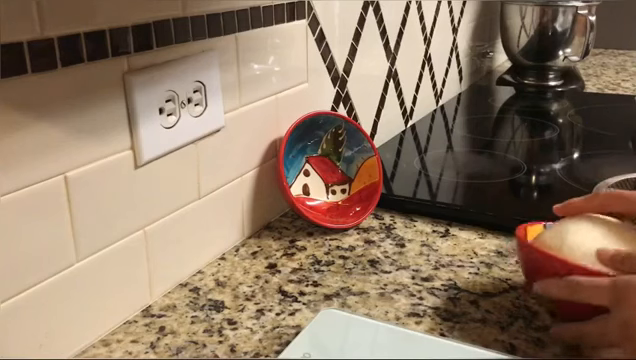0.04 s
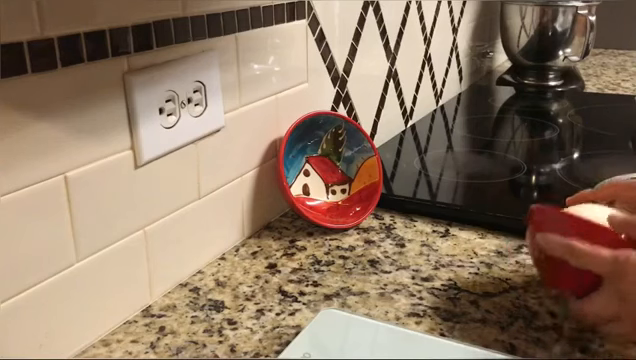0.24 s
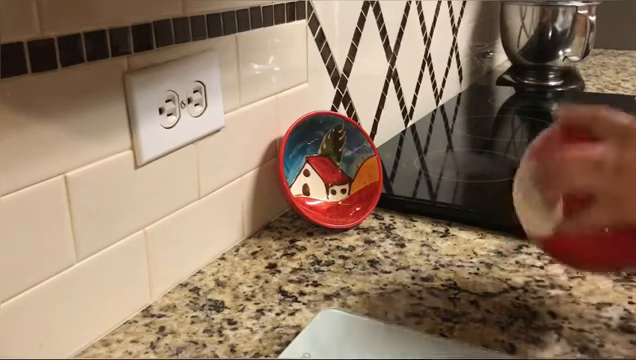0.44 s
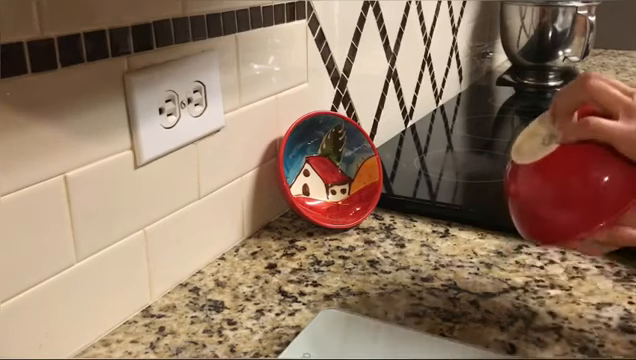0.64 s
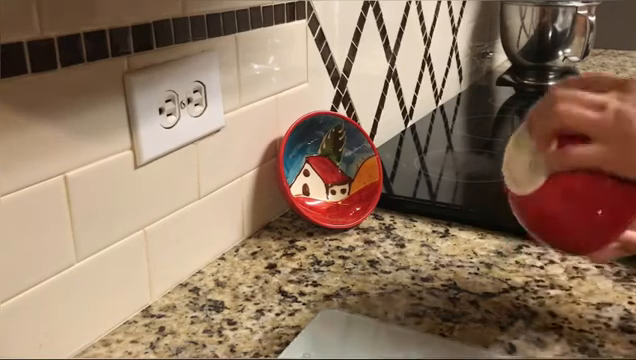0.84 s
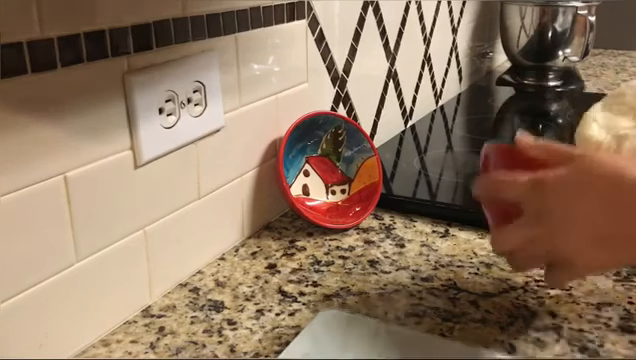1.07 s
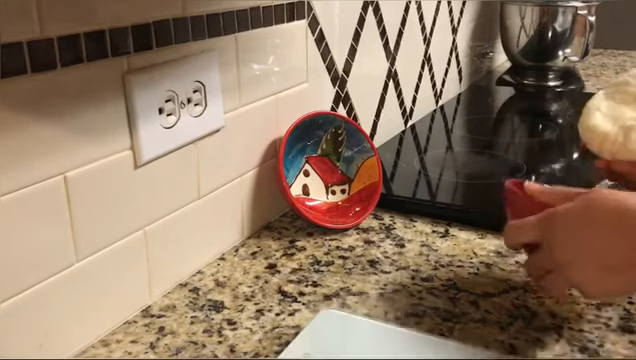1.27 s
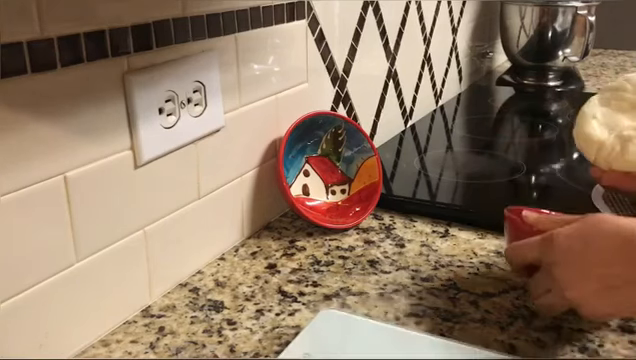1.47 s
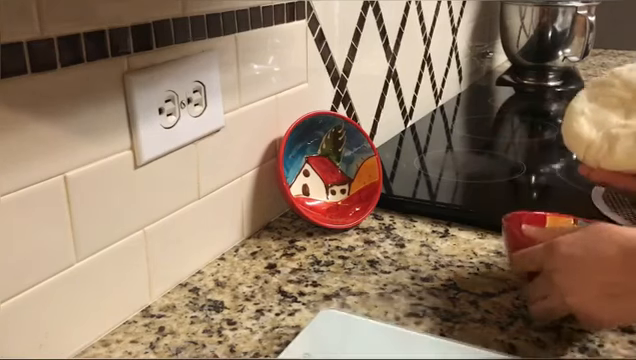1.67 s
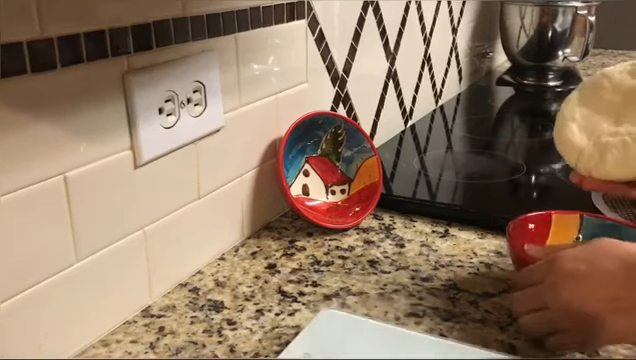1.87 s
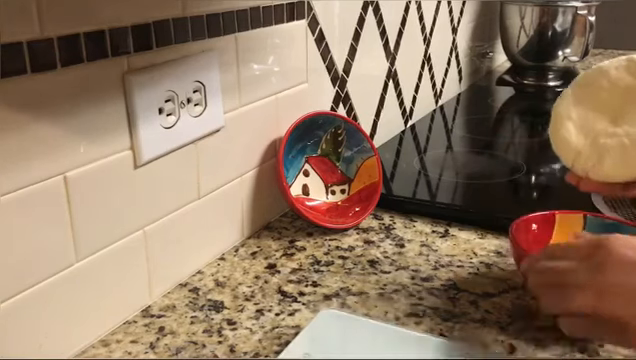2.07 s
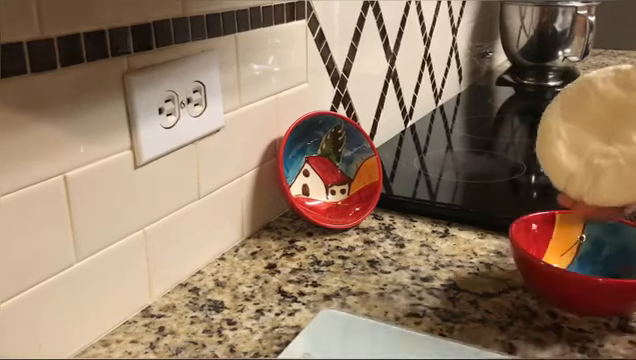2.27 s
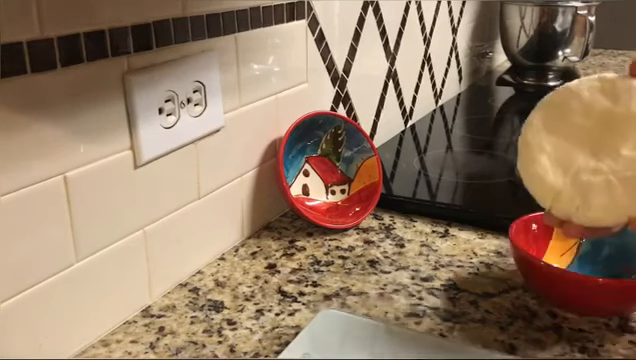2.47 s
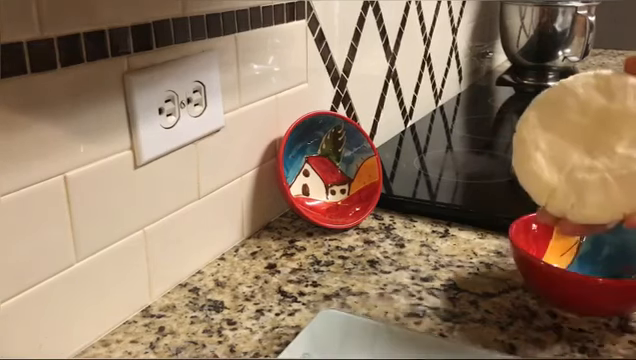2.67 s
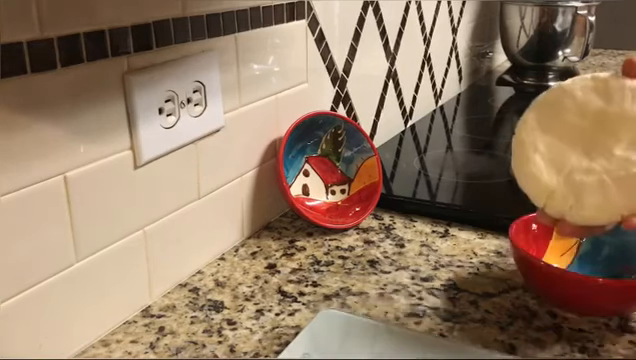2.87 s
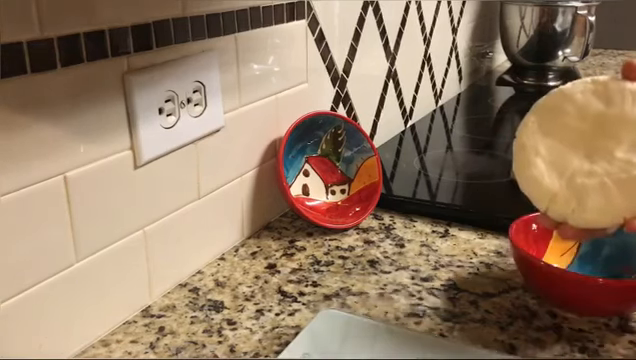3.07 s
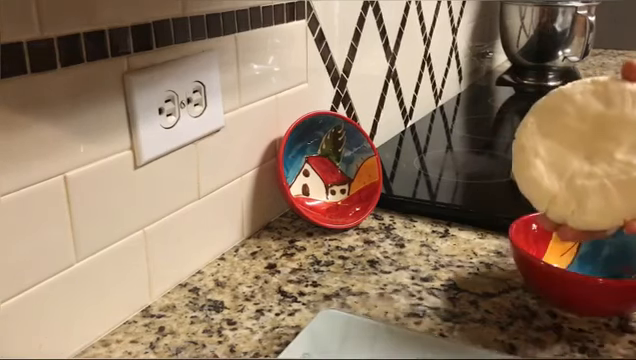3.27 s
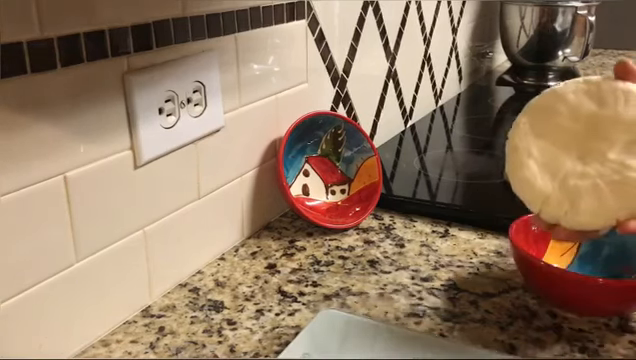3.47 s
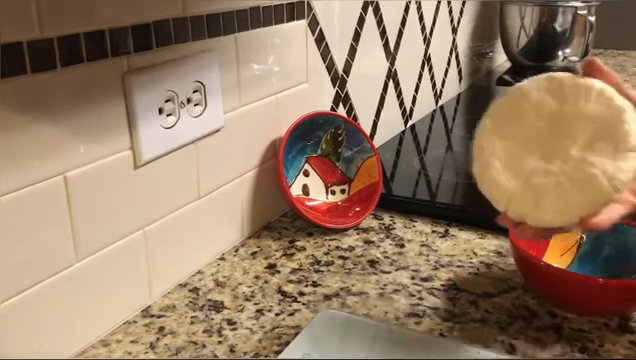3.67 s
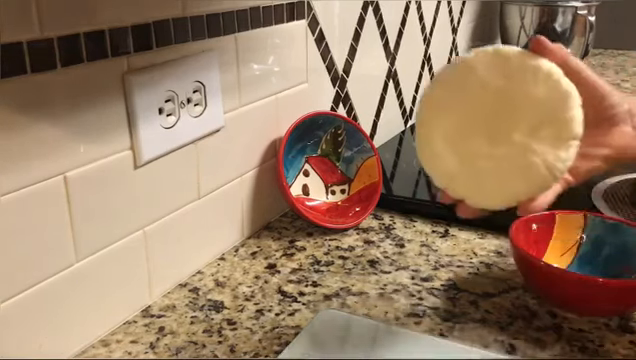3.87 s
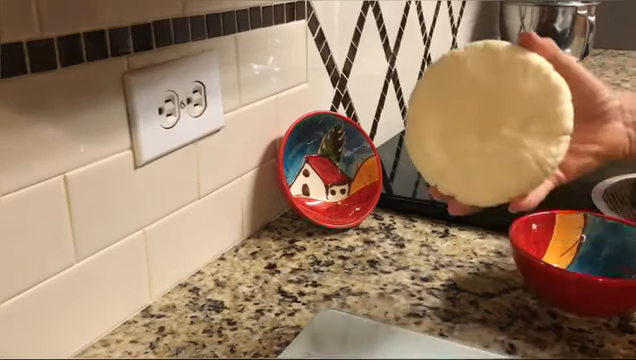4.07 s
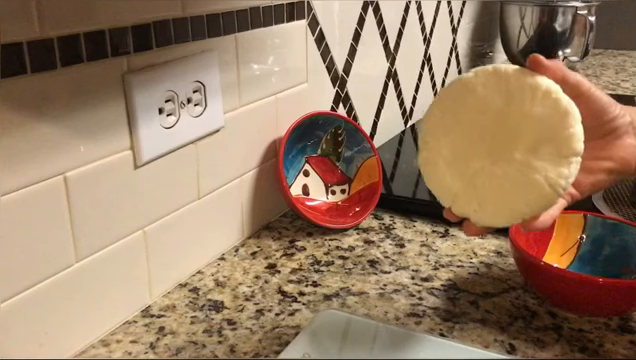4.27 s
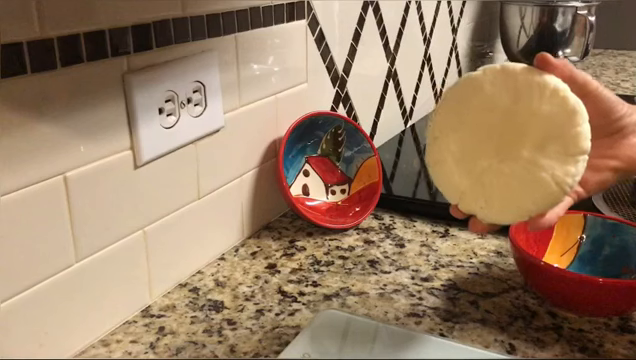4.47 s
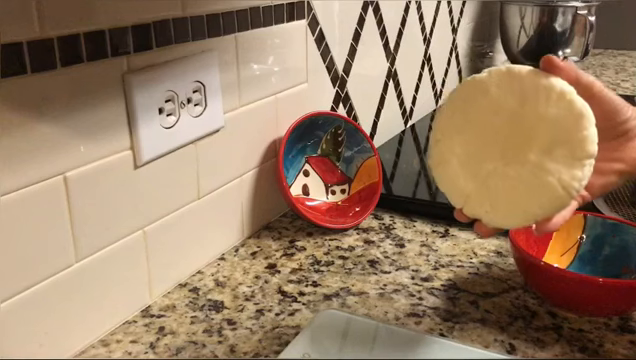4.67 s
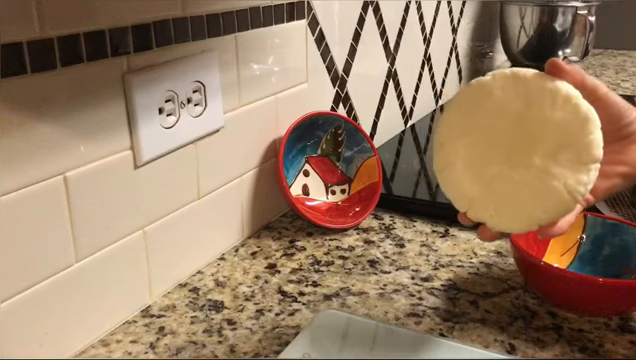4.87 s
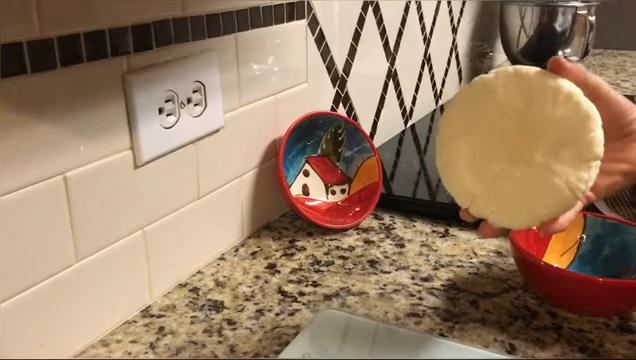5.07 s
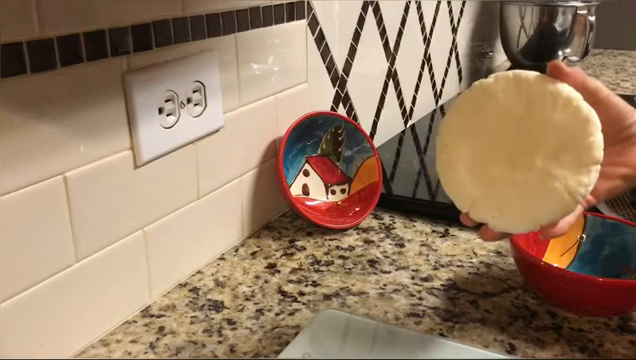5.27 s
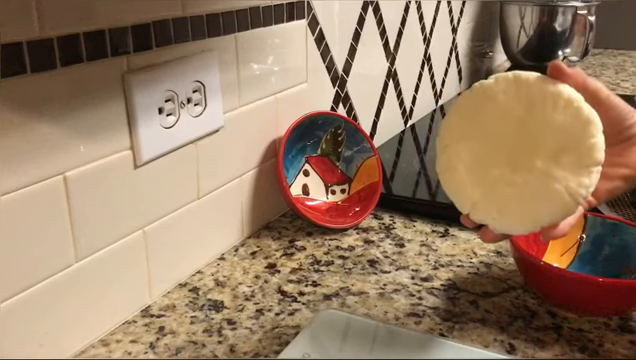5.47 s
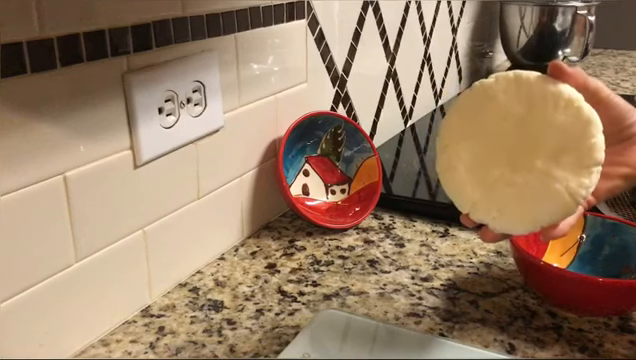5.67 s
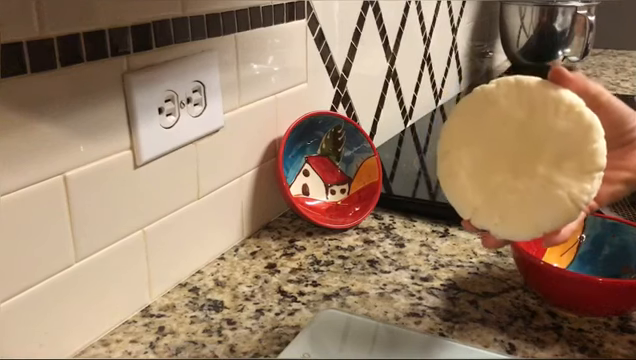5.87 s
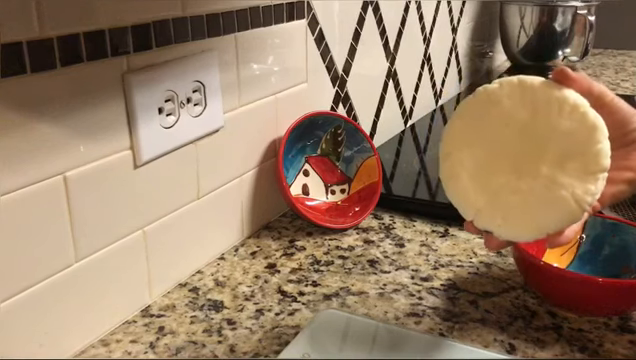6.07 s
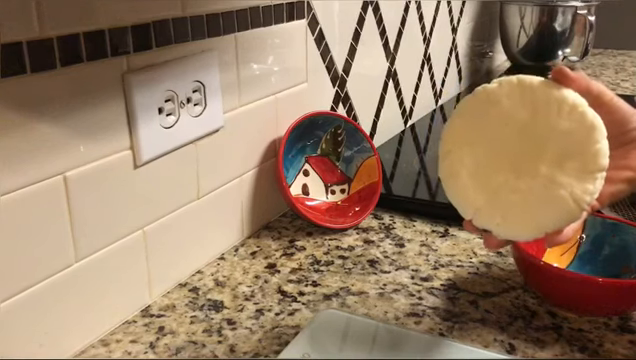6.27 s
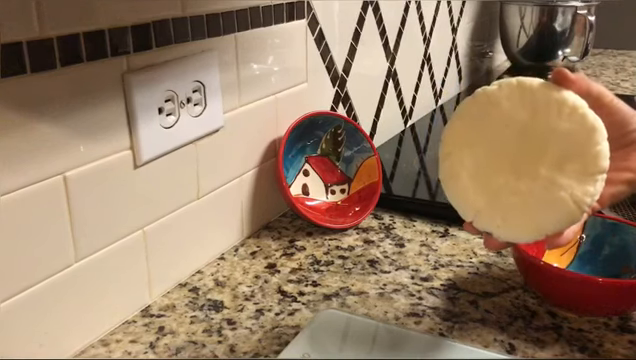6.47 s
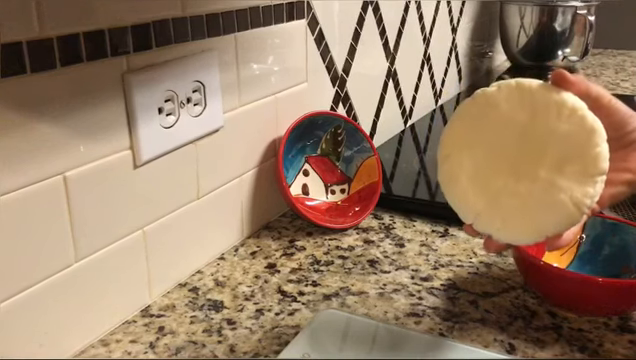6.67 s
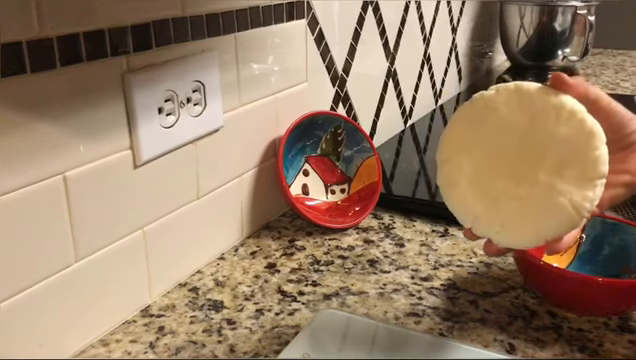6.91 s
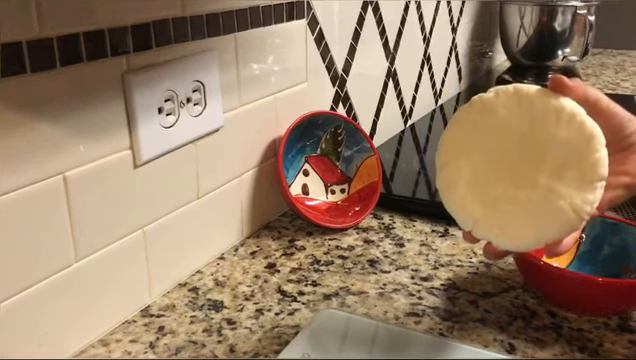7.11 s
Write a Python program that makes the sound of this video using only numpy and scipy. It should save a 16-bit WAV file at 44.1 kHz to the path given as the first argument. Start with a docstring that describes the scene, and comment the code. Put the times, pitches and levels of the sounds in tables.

```python
"""First you hear a kitchen appliance humming and moving air buffeting the microphone. Fingers slip,
squeak and brush as a round of cheese is turned out of a small ceramic bowl. The bowl knocks on a stone
counter, slides and is set down: each blow thuds in the counter and makes the bowl ring like glass.
Later, something small and hard gives a few dry clicks close by. The tiles echo the bowl and the clicks."""
import sys
import numpy as np
from scipy import signal
from scipy.fft import rfft, irfft, next_fast_len
from scipy.io import wavfile
from scipy.ndimage import uniform_filter1d

SR = 44100
rng = np.random.default_rng(int(sys.argv[2]) if len(sys.argv) > 2 else 0)


def master(y):
    """Save y as 16-bit WAV."""
    cut = np.clip(np.atleast_2d(y).T, -1, 1)
    pcm = np.round(cut * 32767)  # scale
    wavfile.write(sys.argv[1], SR, pcm.astype(np.int16))


N = 314874
T = np.arange(N) / SR


def amp(db):
    """Turn decibels into a number to multiply by."""
    return 10 ** (np.asarray(db) / 20)

def unit(x):
    """Scale to an average size (rms) of 1."""
    return x / np.sqrt(np.mean(x ** 2))

def norm(x):
    """Scale to a total energy of 1."""
    return x / np.sqrt(np.sum(x ** 2))

def add(out, s, x):
    """Mix x into out, starting at s seconds."""
    i = int(round(s * SR))
    out[i:i + len(x)] += x[:N - i]

def cut(x, hz, kind="low", order=2):
    """Keep the "low" or the "high" side of hz; a higher order cuts more sharply."""
    return signal.sosfilt(signal.butter(order, np.minimum(hz, .49 * SR), kind, fs=SR, output="sos"), x)

def noise(points, size=N):
    """Noise of rms 1 whose tone colour follows (f/Hz, level/dB) points."""
    hz, db = np.transpose(points)
    span = next_fast_len(size, real=True)
    f = np.maximum(np.arange(span // 2 + 1) * SR / span, 1)
    gain = amp(np.interp(np.log(f), np.log(hz), db))
    return unit(irfft(gain * rfft(rng.standard_normal(span)), span)[:size])

def walk(rate):
    """A smooth random wobble of rms 1, taking `rate` steps a second."""
    hold = int(SR / rate)
    steps = np.repeat(rng.standard_normal(256), hold)[:N]
    return unit(uniform_filter1d(uniform_filter1d(steps, hold), hold))

def fade(t60, size):
    """A fade that drops by 60 dB every t60 seconds."""
    return np.exp(-np.log(1000) * T[:size] / t60)

def ring(hz, db, t60, size):
    """Add up fading tones; neighbours start by swinging opposite ways."""
    t60 = np.broadcast_to(t60, len(hz))
    return sum((-1) ** k * amp(db[k]) * fade(t60[k], size) * np.sin(2 * np.pi * hz[k] * T[:size])
               for k in range(len(hz)))

def resonate(tones, size):
    """A ring of energy 1 from (f/Hz, width/Hz, level/dB) rows: wider tones die sooner."""
    hz, width, db = np.transpose(tones)
    return norm(ring(hz, db + 20 * np.log10(width), np.log(1000) / (np.pi * width), size))

def swell(s, rise, fall):
    """The strength of one movement: it builds up to 1 at time s and dies away."""
    return np.exp(-((T - s) / np.where(T < s, rise, fall)) ** 2)

def swells(rows):
    """Add up movements from (peak t/s, rise/s, fall/s, level/dB) rows."""
    return sum(amp(db) * swell(s, rise, fall) for s, rise, fall, db in rows)


# The appliance's low hum: f/Hz, level/dB
HUM = [(49.25, -42.5), (120, -74), (147.75, -57.5), (150.35, -60.5), (360, -73)]
# A motor's thin whines: f/Hz, relative level/dB
WHINE = [(888.2, -84.5), (1233, -82.5), (1281, -96.5), (1330, -79.5), (1427, -81.5), (1561, -89),
         (2078, -90.5), (2277, -95.5)]
# The tone colour of the room's air: f/Hz, relative level/dB
ROOM_AIR = [(20, -3.5), (45, -9), (70, -17), (120, -24.5), (180, -22.5), (250, -27.5), (350, -28.5),
            (430, -35), (600, -34), (1100, -46), (1400, -42.5), (1800, -50), (4000, -54.5), (10000, -57.5),
            (16000, -63)]

def appliance_and_air(air_db, whine_gain_db, waver_db):
    """Two motors hum, throbbing as they drift in and out of step; thin whines waver over the air."""
    crest_s = .117  # here the hum's tones all swell together
    hum = sum(amp(db) * np.cos(2 * np.pi * hz * (T - crest_s)) for hz, db in HUM)
    waver = amp(whine_gain_db + waver_db * walk(11))
    lag_s = 0.00015 * walk(30)  # the shaft's speed wanders, and every whine with it
    whine = waver * sum(amp(db) * np.sin(2 * np.pi * hz * (T + lag_s)) for hz, db in WHINE)
    air = noise(ROOM_AIR)
    air /= np.std(cut(air, 202, "high", order=6))  # air_db sets the part above the rumble
    return np.sqrt(2) * (hum + whine) + amp(air_db) * air


# Air pushed by moving hands: peak t/s, rise/s, fall/s, level/dB
GUSTS = [(.39, 0.22, .3, -15), (1.35, 0.47, 0.44, -28.5), (2.35, .35, 0.196, -24), (5.1, 0.34, 0.2, -37.5)]
# Soft pops of air: t/s, strength/dB, rise/s, fall/s, tick strength/dB
POPS = [(0.2255, -11, 0.00057, 0.019, -74), (1.3291, -10, 0.00039, 0.019, -22.5)]

def air_buffets(draught_db, tick_t60, swing_hz):
    """Air pushes on the microphone: slow swings, and two sudden dips in pressure, each with a tick."""
    swing = noise([(1, -12), (swing_hz, 0), (6, -7), (12, -23), (30, -39), (100, -62),
                   (400, -110), (2000, -160)])
    out, size = swing * (amp(draught_db) + swells(GUSTS)), SR // 20
    for s, db, rise, fall, tick_db in POPS:
        onset = .5 + np.arctan((T - s) / rise) / np.pi
        out -= amp(db) * onset * np.exp(-np.hypot(T - s, rise) / fall)
        tick = cut(rng.standard_normal(size), 4300) * fade(tick_t60, size)
        add(out, s, amp(tick_db) * tick)
    return out


# Fingertips slipping on the glaze: peak t/s, rise/s, fall/s, relative level/dB
FINGER_SLIPS = [(.12, 0.078, 0.13, -78), (.315, 0.01, 0.0068, -55), (.81, .012, .012, -73)]
# The glassy tones of the bowl's wall: f/Hz, width/Hz, relative level/dB
BOWL_TONES = [(5860, 41, 0), (6860, 90, -10), (7500, 34, -7), (8930, 35, -14), (9150, 25, -14),
              (9310, 79, -13), (9930, 32, -12), (10400, 25, -25), (10800, 26, -24), (11700, 34, -26),
              (12900, 53, -22), (13100, 42, -18), (13500, 40, -23), (14700, 73, -29)]

def slips_and_drag(drag_start_s, drag_end_s, drag_db, flicker_db):
    """Tiny slips of the fingers, then of the bowl's foot, make the bowl sing; the foot also grates."""
    fade_in = np.clip((T - drag_start_s) / 0.12, 0, 1)
    fade_out = np.clip((drag_end_s - T) / .01, 0, 1)
    drag = amp(drag_db) * fade_in * fade_out
    flicker = amp(flicker_db * walk(35))
    slips = rng.standard_normal(N) * flicker * (drag + swells(FINGER_SLIPS))
    grit = amp(-1) * drag * flicker * cut(noise(THUD), 990.7, "high")  # the counter's sound, minus bass
    singing = signal.oaconvolve(cut(slips, 19000, order=1), resonate(BOWL_TONES, SR // 6))[:N]
    return grit + singing


# Short damp squeaks: t/s, f/Hz, length/s, level/dB
SQUEAKS = [(0.19, 652, .012, -48), (0.303, 539, 0.013, -42.5), (0.315, 610, 0.021, -42),
           (0.388, 399.5, 0.0097, -46), (0.651, 3700, 0.034, -57.5), (1.924, 445, 0.027, -39),
           (2.384, 3610, 0.015, -62)]

def squeaks(pitch_spread):
    """A damp surface sticks and slips for a moment, making a tone with a rough pitch."""
    out = np.zeros(N)
    for s, hz, length, db in SQUEAKS:
        jitter = unit(cut(rng.standard_normal(N), 150))
        phase = 2 * np.pi * np.cumsum(hz * (1 + pitch_spread * jitter)) / SR
        out += amp(db) * swell(s, length / 2, length / 2) * np.sin(phase)
    return out


# Strokes of cheese and skin: peak t/s, rise/s, fall/s, relative level/dB, extra treble/dB
STROKES = [(.205, .02, .025, -75, 6), (.32, 0.053, 0.038, -78, 9), (.61, .24, .115, -68, 1),
           (.98, .1, 0.22, -75, 1), (1.23, 0.068, .3, -80, 0), (2.04, .02, 0.094, -63.5, 3),
           (2.25, .08, .11, -71.5, 4), (2.39, 0.024, 0.024, -70, -7), (3.769, .17, 0.16, -79.5, -6)]

def rubbing(flicker_db, mid_db, treble_db):
    """Cheese and palm brush over the glaze in an uneven whisper, stroke by stroke."""
    mid = noise([(100, -5), (500, 9), (1200, 2.5), (2200, -3), (4200, -9), (6000, -13.5), (16000, -33)])
    top = noise([(100, -34), (3000, -10.5), (5500, -3.5), (10000, -0.5), (16000, -17.5)])
    out = sum(amp(db) * swell(s, rise, fall) * (amp(mid_db) * mid + amp(treble_db + bright_db) * top)
              for s, rise, fall, db, bright_db in STROKES)
    return out * amp(flicker_db * walk(31))


# The bowl touches twice, then rocks down on its foot: t/s, strength/dB, treble cut-off f/Hz
KNOCKS = [(1.6282, -8.5, 1350), (1.631, -4.5, 480), (1.7344, -11, 1300), (1.7472, -11, 1300),
          (1.759, -3, 400), (1.767, -18, 1100), (1.982, -4, 1997), (1.9875, -5, 2598), (1.9923, 0.5, 2435),
          (2.0005, -7.5, 3100), (2.0034, -8.5, 2593), (2.0105, -9, 1505), (2.084, -16.5, 1860),
          (2.115, -25, 1290)]
# The tones of bowl and counter together: f/Hz, relative level/dB
COUNTER_TONES = [(177.6, -45), (274.5, -49), (376.8, -39), (608.3, -41), (796.7, -43), (877.5, -37),
                 (942.1, -44), (995.9, -35), (1082, -28), (1233, -43), (1260, -39), (1421, -40),
                 (1470, -42), (1696, -42), (1803, -52), (1890, -48), (1970, -48), (2051, -51), (2514, -51),
                 (2708, -58), (3198, -58), (3311, -65)]
# The thud's tone colour, a blur of many short rings: f/Hz, relative level/dB
THUD = [(50, -39.5), (115, -19.5), (170, -3), (255, -5.5), (315, -15), (385, -8), (520, -5), (720, -5),
        (1020, -0.5), (1500, -7.5), (2100, -13), (2800, -15.5), (4000, -26), (9000, -36)]

def knocks(tones_db, body_db, wall_db, tick_db, body_t60, tick_t60, held_t60):
    """The bowl lands while a hand muffles it; a softer touch thuds deeper and rings its wall less."""
    out, size = np.zeros(N), SR // 4
    hard_hz, ring_db_per_octave = 2408, 15  # a cut-off above hard_hz boosts the ring; below, it weakens
    tick_colour = [(1000, -5.5), (4000, -0.5), (9000, -0.5), (13000, -6.5), (16000, -19.5)]
    hz, db = np.transpose(COUNTER_TONES)
    tones = norm(ring(hz, db, held_t60, size))
    wall = norm(cut(resonate(BOWL_TONES, size), 8000, "high", order=1))
    for s, blow_db, contact_hz in KNOCKS:
        ring_db = blow_db + ring_db_per_octave * np.log2(contact_hz / hard_hz)
        body = norm(noise(THUD, size) * fade(body_t60, size))
        thud = cut(amp(tones_db) * tones + amp(body_db) * body, contact_hz, order=5)
        thud = cut(thud, .11 * contact_hz, "high", order=1)  # harder touches have less bass
        tick = norm(noise(tick_colour, size) * fade(tick_t60, size))
        clink = amp(wall_db) * wall + amp(tick_db) * tick
        add(out, s, amp(blow_db) * thud + amp(ring_db) * clink)
    return out


def kitchen_echo(x, low_t60, high_t60, treble_db, build_s):
    """Sound bounces off tiles and cupboards and blurs; bass and treble fade at their own speeds."""
    wash = rng.standard_normal(SR)
    low = cut(wash, 2500, order=1)
    low_fade = fade(low_t60, SR)
    tail = low * low_fade + amp(treble_db) * (wash - low) * fade(high_t60, SR)
    build_up = 1 - np.exp(-(T[:SR] / build_s) ** 2)
    return signal.fftconvolve(x, tail * build_up / np.linalg.norm(low_fade))[:N]


def free_ring(gain_db, t60):
    """After the heaviest blow the bowl stands on the stone and rings on freely."""
    out = np.zeros(N)
    hz, db = np.transpose(COUNTER_TONES)
    times, blow_db, _ = np.transpose(KNOCKS)
    add(out, times[np.argmax(blow_db)], ring(hz, db + gain_db, t60, SR // 2))
    return out


# Double clicks: t/s, crack strength/dB, ring strength/dB, treble cut-off f/Hz,
# gap to the second snap/s, second snap compared with the first/dB
CLICKS = [(2.8152, -32.5, -38, 9000, .002, -14), (3.0255, -8, -13.5, 16660, 0.0035, -12),
          (3.3063, -14, -18, 14310, 0.0015, -8.5), (5.2191, -32.5, -27.5, 9000, 0.0021, -8.5),
          (5.3132, -12, -12, 15900, .0015, 1), (5.5, -8.5, -7, 4240, 0.002386, -8.5)]
# The tones of the clicking object: f/Hz, width/Hz, relative level/dB
CASE_TONES = [(590, 50, -19), (725, 60, -16), (990, 70, -13), (1250, 90, 0), (1400, 110, -3),
              (1740, 110, -18), (2285, 140, -13), (3410, 160, -14), (4955, 240, -15), (6550, 360, -22)]
# The tone colour of its crack: f/Hz, relative level/dB
CRACK = [(200, -46), (450, -15), (650, 4.5), (900, 1), (1400, 8.5), (2600, -3.5), (5000, 0.5), (9000, -7),
         (13000, 0.5), (16000, -14)]

def clicks(crack_t60, scatter_t60, ring_to_room_db, room_db):
    """Something small and hard, like a plastic case, snaps close by: first bright, then duller."""
    direct, to_room, size = np.zeros(N), np.zeros(N), SR // 10
    shell = resonate(CASE_TONES, size)
    for s, crack_db, ring_db, top_hz, gap_s, second_db in CLICKS:
        first = (s, crack_db, ring_db, top_hz)
        # the second snap has less treble and more ring
        second = (s + gap_s, crack_db + second_db, ring_db + second_db + 6, top_hz * 0.55)
        for at, snap_db, shell_db, hz in (first, second):
            case = cut(amp(shell_db) * shell, hz, order=1)
            crack = amp(snap_db) * norm(noise(CRACK, size) * fade(crack_t60, size))
            add(direct, at, case + cut(crack, hz, order=1))
            # the part of the crack that spreads out to the walls
            scattered = amp(snap_db) * norm(noise(CRACK, size) * fade(scatter_t60, size))
            add(to_room, at, amp(ring_to_room_db) * case + cut(scattered, hz, order=1))
    echo = kitchen_echo(to_room, low_t60=0.48, high_t60=0.3, treble_db=-3.5, build_s=0.0083)
    return direct + amp(room_db) * echo


def scene():
    """Mix the bowl, hands and clicks with the kitchen's hum and air, in one channel."""
    bowl = knocks(tones_db=8.5, body_db=11, wall_db=-5, tick_db=-12.5,
                  body_t60=.06, tick_t60=0.074, held_t60=0.099)
    bowl += slips_and_drag(drag_start_s=1.745, drag_end_s=1.985, drag_db=-60.5, flicker_db=1)
    bowl += squeaks(pitch_spread=0.074)
    echo = amp(-8) * kitchen_echo(bowl, low_t60=0.59, high_t60=0.27, treble_db=-3, build_s=.01)
    near = rubbing(flicker_db=0.84, mid_db=11, treble_db=-1)
    near += clicks(crack_t60=0.03, scatter_t60=.07, ring_to_room_db=-4.5, room_db=-8.5)
    air = air_buffets(draught_db=-48.5, tick_t60=0.0068, swing_hz=4)
    air += appliance_and_air(air_db=-63.79, whine_gain_db=1, waver_db=2)
    return (bowl + free_ring(gain_db=8, t60=0.34) + echo + near + air)[None]


def record(dry):
    """Cut away the highest treble, above 16000 Hz."""
    return signal.sosfilt(signal.ellip(8, .2, 70, 16000, fs=SR, output="sos"), dry)


dry = scene()
out = record(dry)
master(out)
```